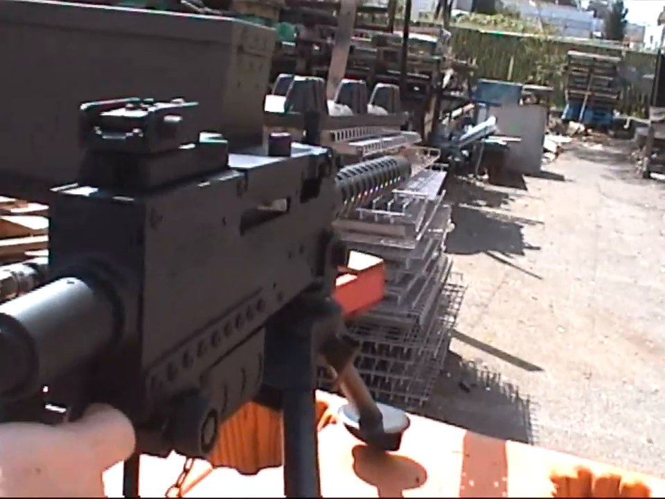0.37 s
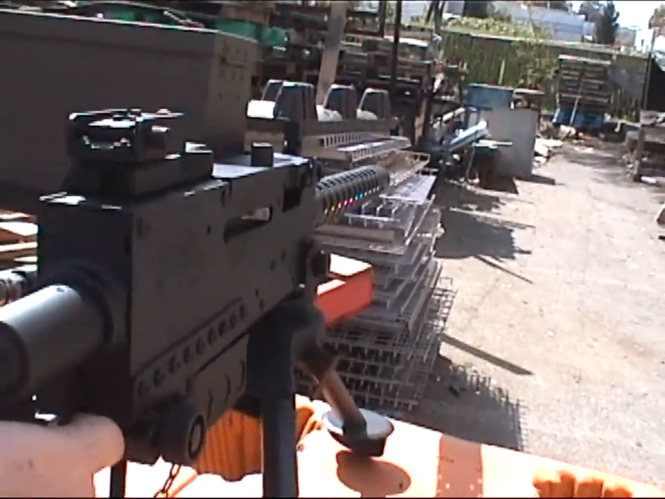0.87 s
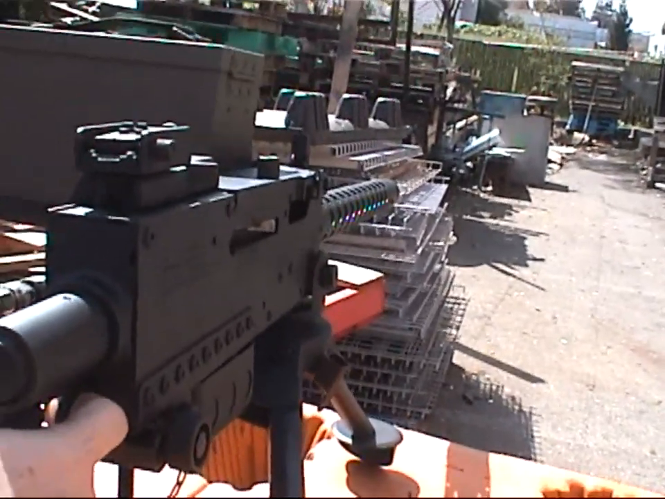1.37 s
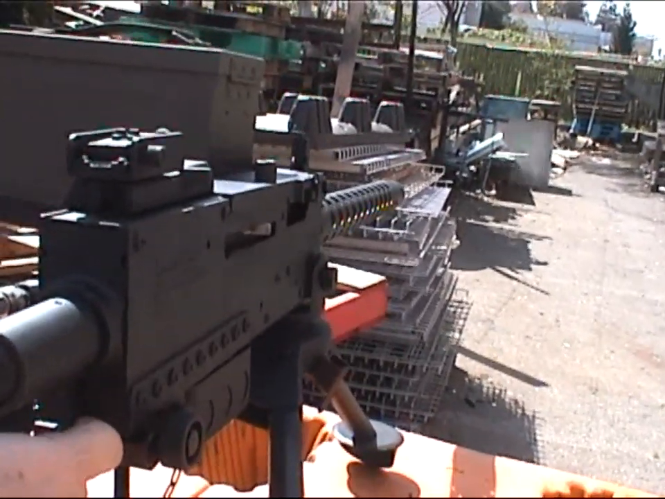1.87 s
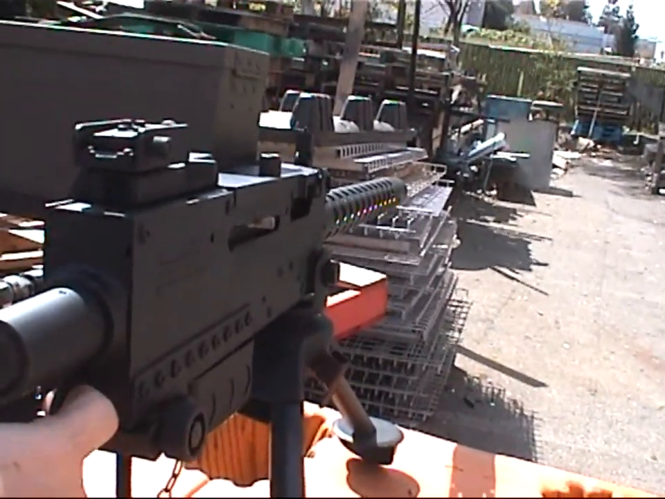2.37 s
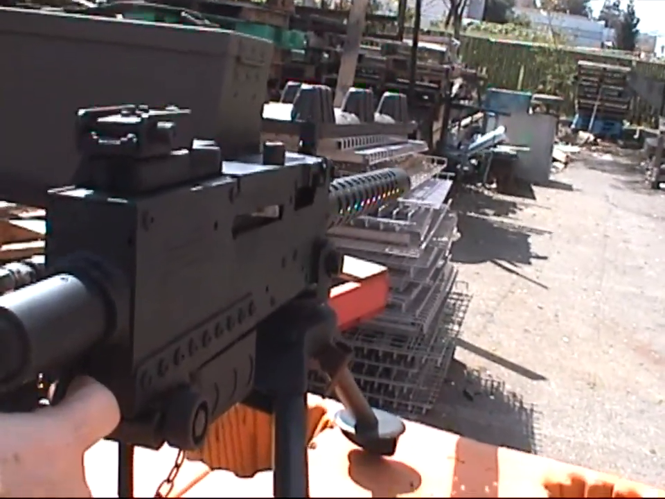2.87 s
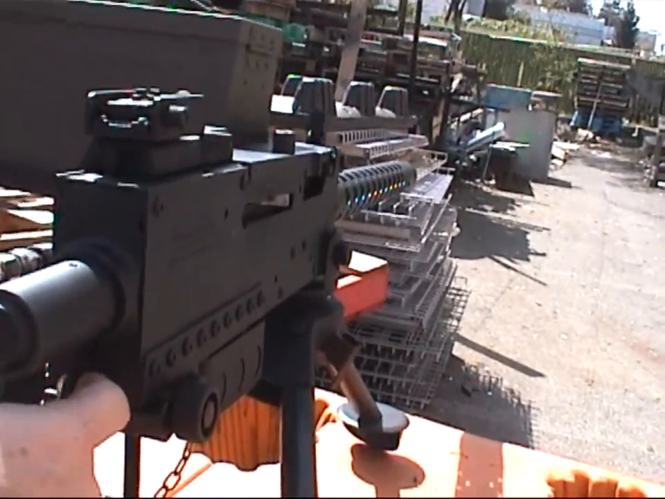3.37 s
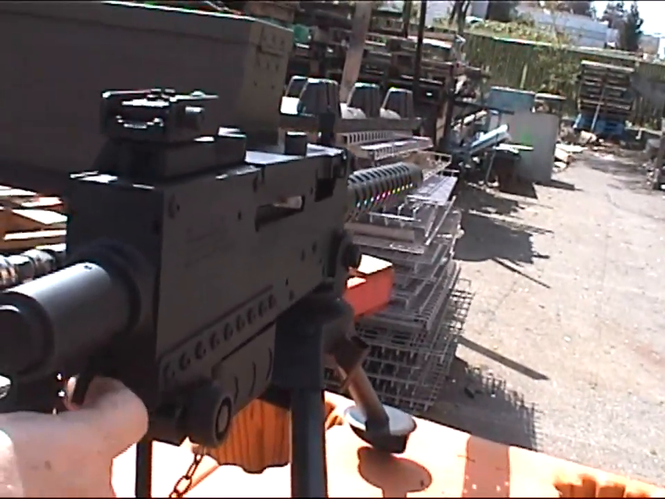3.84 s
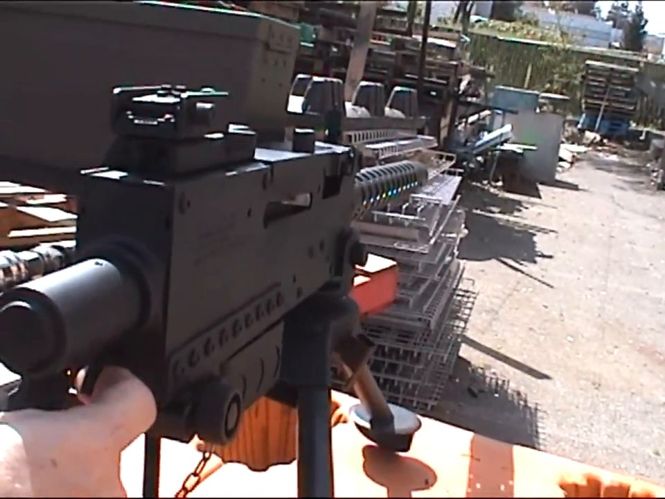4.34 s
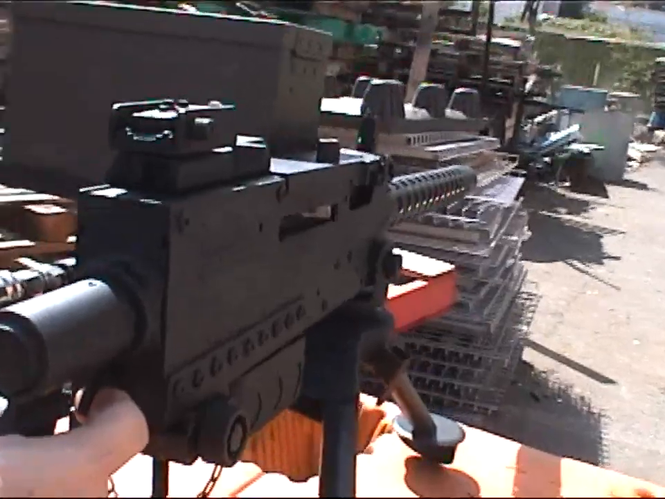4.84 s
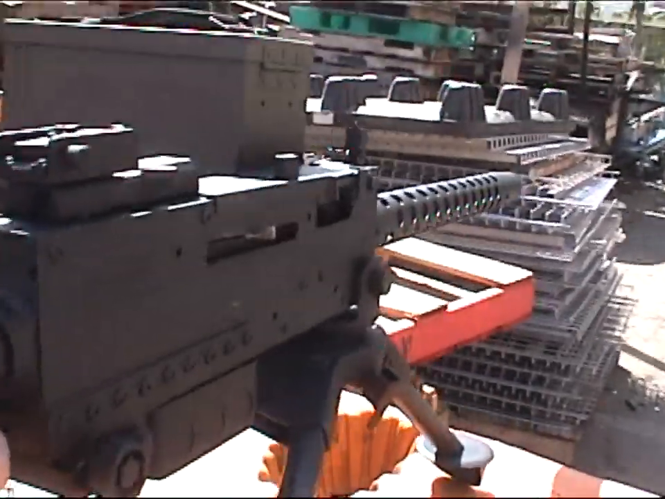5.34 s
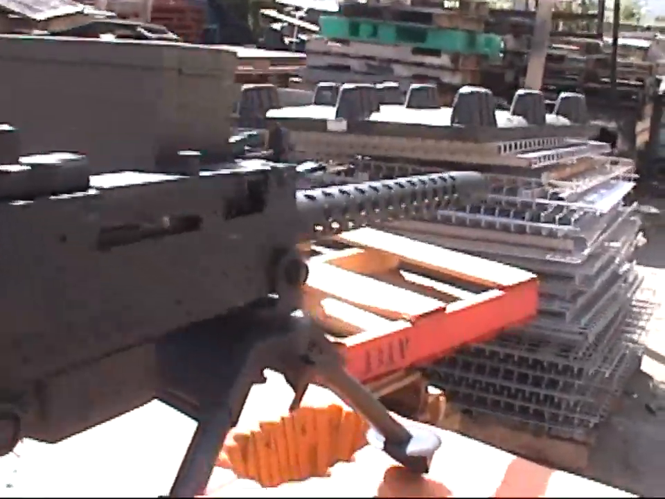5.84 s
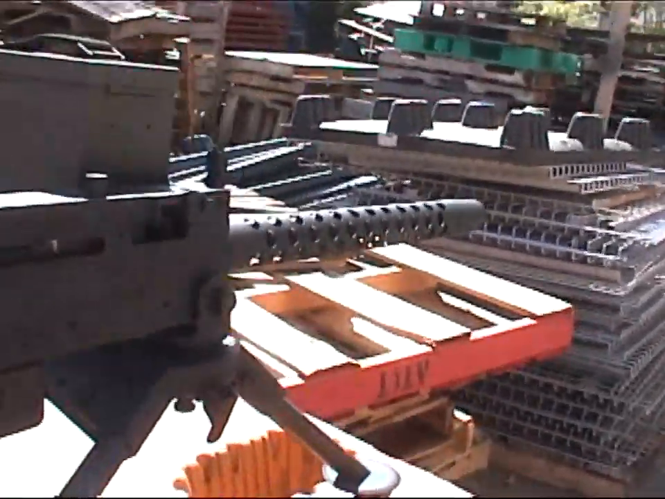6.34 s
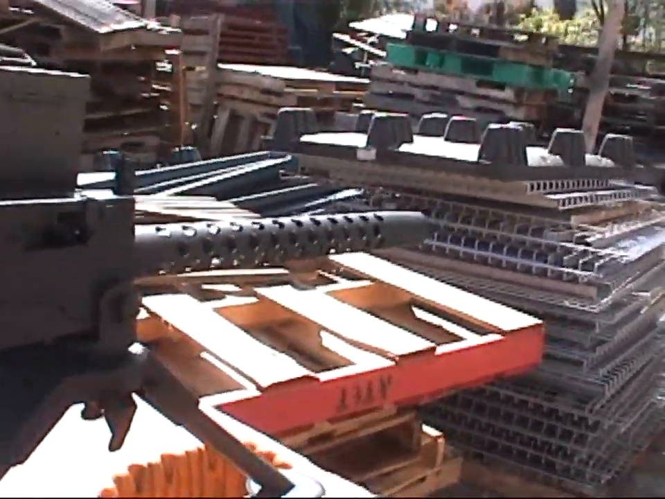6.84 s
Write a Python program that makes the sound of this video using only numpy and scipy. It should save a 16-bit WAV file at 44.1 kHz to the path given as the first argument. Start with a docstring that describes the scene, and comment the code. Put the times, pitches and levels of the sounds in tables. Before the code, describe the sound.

In an open pallet yard, a paintball machine gun is heard very close in stereo, firing about eight rounds a second. Each round has a light metallic bolt clack, a hard short pop ringing the barrel, a gas burst, a quick vent hiss and tiny feed clicks. The end of a burst gives two shots at 0.07-0.2 s, with ball strikes already booming on distant steel. Four shots follow at 1.3-1.7, a dry snap off to one side at 1.9, nine shots at 2.5-3.5, a small click near 3.7, thirteen at 4.0-5.6, and six from 6.5 to the end. Balls crack and ring a hollow container from 2.6 to 3.7, 4.2 to 5.7 and after 6.7, increasingly hollow and dull. A distant machine drone recedes early over faint town hum. From 5 to 6.4 the microphone moves beside the barrel, making the final shots brighter and hollower.

```python
"""Pallet yard: a gas-driven paintball gun fires five bursts close to a stereo microphone.
Each round is a bolt clack, a pressure-dip pop that rings the barrel, a gas blast and a vent hiss, in shaped noise.
The balls crack on a distant steel container, ring its panels and make it boom; the yard echoes the rounds.
Small clicks, one snap, a faint town hum and a machine that moves away fill the rest."""
import sys
import numpy as np
from scipy import signal
from scipy.fft import rfft, irfft
from scipy.io import wavfile
from scipy.ndimage import uniform_filter1d, map_coordinates

SR = 44100
rng = np.random.default_rng(int(sys.argv[2]) if len(sys.argv) > 2 else 0)


def file_out(sig):
    """Save sig as 16-bit WAV at sys.argv[1]."""
    # one column per channel
    cols = np.atleast_2d(sig).T
    # limit, then scale
    lim = np.clip(cols, -1, 1)
    pcm = np.round(lim * 32767).astype(np.int16)
    wavfile.write(sys.argv[1], SR, pcm)


def invert_db(level):
    """Linear amplitude ratio for a level in decibels (20 dB per decade), elementwise."""
    return 10 ** (np.asarray(level, dtype=float) / 20)


N = 317961
BLAST_DB = -12  # common reference of the pop and the gas blast

# Balls striking steel. Each row: time in seconds, relative level in dB, boom treble tilt in dB per three octaves.
HITS = [(0.003, -8.5, -4.5), (0.029, -11, 1.5), (0.159, -13.5, -11), (0.285, -20, 9), (2.649, -7.5, 4),
        (2.785, -16, -4.5), (2.954, -11, 1), (3.042, -10.5, 4), (3.177, -10, 1.5), (3.332, -14, 1),
        (3.417, -11.5, 4), (3.545, -12, 3), (3.659, -22, -1), (4.214, -10, 3), (4.364, -10, -1.5),
        (4.472, -10, 1), (4.651, -12.5, -1.5), (4.747, -12, 1), (4.868, -13, 1.5), (4.983, -11.5, 2.5),
        (5.149, -13, 2.5), (5.276, -14.5, 1.5), (5.359, -11, 3), (5.609, -11, 3), (5.738, -10, 1.5),
        (6.691, -10.5, -2.5), (6.825, -9.5, 0), (6.949, -10, -1), (7.08, -11, 0)]
# Reverberation by octave. Each row: centre in Hz, container boom in relative dB, boom t60 in seconds,
# yard echo in relative dB, echo t60 in seconds, gain of the side signal in dB.
BANDS = [(110, -52, .6, -43.5, .3, -20), (282, -24, 0.54, -9.5, 0.46, -22),
         (495, -15.5, 0.54, -10, 0.44, -16.5), (953, -14, 0.8, -2.5, 0.35, -16.5),
         (2030, -11, 0.68, -0.5, 0.34, -13.5), (4000, -11.5, 0.37, -6, 0.62, -6.5),
         (8000, -22, 0.17, -11, 0.38, -3.5), (13040, -44, .3, -34, .2, -3.5)]


def tone(x, table):
    """Minimum-phase filter through (Hz, relative dB) points, from the log-gain cepstrum; white noise keeps its rms."""
    hz, db = np.transpose(table)
    grid = np.maximum(np.fft.rfftfreq(4096, 1 / SR), 1)
    cepstrum = irfft(np.log(invert_db(np.interp(np.log(grid), np.log(hz), db))))
    cepstrum[1:2048] *= 2
    cepstrum[2049:] = 0
    kernel = irfft(np.exp(rfft(cepstrum)))[:2048]
    kernel = kernel / np.sqrt(np.sum(kernel ** 2))
    return signal.fftconvolve(x, kernel[None], axes=1)[:, :N]


def train(times_s, gains):
    """One impulse per event."""
    at = (np.asarray(times_s) * SR).astype(int)
    gains = gains + 0 * at
    return np.bincount(at[at < N], gains[at < N], N)


def swell(times_s, db, rise_s, t60_s):
    """Amplitude envelope: powers of the events rise, die away and add."""
    up = np.exp(-1 / (rise_s * SR))
    down = np.exp(-np.log(1e6) / (t60_s * SR))
    power = signal.lfilter([1 - up], np.convolve([1, -up], [1, -down]), train(times_s, invert_db(db) ** 2))
    return np.sqrt(power.clip(0))


def ring(x, hz, t60_s):
    """One decaying mode: a complex one-pole resonator."""
    pole = np.exp(2j * np.pi * hz / SR - np.log(1000) / (t60_s * SR))
    return signal.lfilter([1], [1, -pole], x).imag


def band(x, hz, width_hz):
    """Band-pass that keeps white noise at about rms 1."""
    low, high = max(hz - width_hz / 2, hz / 4), min(hz + width_hz / 2, 0.45 * SR)
    sos = signal.butter(2, [low, high], "band", fs=SR, output="sos")
    return signal.sosfilt(sos, x) * np.sqrt(SR / 2 / (high - low))


def above(x, hz):
    """Second-order high-pass."""
    return signal.sosfilt(signal.butter(2, hz, "high", fs=SR, output="sos"), x)


def hiss(grain=0):
    """Mid and side white noise; a fast random gain shared by both makes it crackle."""
    noise = rng.standard_normal((2, N))
    return noise * invert_db(grain * 2.5 * uniform_filter1d(rng.standard_normal(N), size=16))


def walked():
    """Share of the way that the microphone has been carried from behind the gun to beside the barrel."""
    # Each row: time in seconds, share of the way.
    walk = [(0, 0), (5.0, 0), (6.4, 1), (7.21, 1)]
    return np.interp(np.arange(N) / SR, *np.transpose(walk))


def rounds():
    """Pop time and relative clack, vent, echo and thump dB per ball; the clack gets softer along each burst."""
    # Trigger pulls. Each row: first pop in seconds, then first clack, vent, echo and thump in relative dB.
    bursts = [(0.0674, -15.5, -14, -13, 1.5), (1.3378, -14.5, -12.5, -18, 5),
              (2.4763, -15, -13.5, -19.5, 0), (4.0400, -15, -13.5, -21.5, -1),
              (6.5225, -16.5, -13.5, -21, 0.5)]
    # Balls in each burst.
    counts = [2, 4, 9, 13, 6]
    # Balls already fired when each burst is first heard: the first burst is under way.
    fired_before = [8, 0, 0, 0, 0]
    cycle_s, fade_db, fade_rounds = 0.12674, -5.5, 4.0  # fade_rounds: time constant in balls
    first_s, clack_db, vent_db, echo_db, thump_db = np.repeat(bursts, counts, axis=0).T
    before = np.repeat(fired_before, counts)
    k = np.concatenate([np.arange(count) for count in counts])
    fade = np.exp(-before / fade_rounds) - np.exp(-(before + k) / fade_rounds)
    return first_s + k * cycle_s, clack_db + fade_db * fade, vent_db, echo_db, thump_db


def clack(s, clack_db):
    """Two light valve ticks, then the heavier bolt: metal impacts as crackling noise ahead of the pop."""
    # Each row: frequency in Hz, density in relative dB per Hz.
    clack_colour = [(59, -63.5), (100, -24.5), (381, -12.5), (950, 2), (3940, 6.5), (4380, 2), (5190, -0.5),
                    (7290, 1.5), (12400, -5.5), (16000, -15.5)]
    late, louder = rng.standard_normal((2, len(s)))
    valve = swell(s - 0.0185, clack_db - 18.5, 0.001, 0.05) + swell(s - 0.0150, clack_db - 15, 0.001, 0.019)
    bolt = swell(s - 0.0132 + 0.00071 * late, clack_db + 6 + 0.81 * louder, 0.00076, 0.071)
    return tone(hiss(1.5) * (valve + bolt), clack_colour)


def blast(s):
    """Turbulent gas leaves the muzzle: a crackling noise burst."""
    # Each row: frequency in Hz, density in relative dB per Hz.
    blast_colour = [(59, -24.5), (100, -6.5), (1150, -2), (2130, 1.5), (3050, -3), (4110, -2), (6020, -6.5),
                    (9410, -7), (15000, -18), (16000, -46.5)]
    level_db = BLAST_DB + 10 + 0.99 * rng.standard_normal(len(s))
    return tone(hiss(1.4) * swell(s + 0.00011, level_db, 0.0034, 0.05), blast_colour)


def vent(s, vent_db):
    """Spent gas vents 16 ms after the pop: crackling noise."""
    # Each row: frequency in Hz, density in relative dB per Hz.
    vent_colour = [(59, -19), (100, -20.5), (801, 3), (1420, -1.5), (2040, -6), (4110, 1.5), (6150, -0.5),
                   (13800, -10), (16000, -30.5)]
    late, louder = rng.standard_normal((2, len(s)))
    puff = swell(s + 0.016 + 0.00074 * late, vent_db + 6.5 + 0.87 * louder, 0.0017, 0.037)
    return tone(hiss(1.5) * puff, vent_colour)


def feed(s):
    """Small parts click after each pop as the next ball feeds."""
    # Each row: delay in seconds, mean level in dB.
    feed_clicks = [(.041, -21), (.064, -31), (.081, -31.5)]
    puffs = sum(swell(s + lag, db + 3 * rng.standard_normal(len(s)), 0.0003, 0.0086) for lag, db in feed_clicks)
    return band(hiss() * puffs, 8000, 9000)


def pop(s, thump_db):
    """A 0.6 ms pressure dip, alike every round, slaps off pallets and rings the barrel; its wave thumps the mic."""
    # Barrel and housing modes. Each row: frequency in Hz, relative level in dB, t60 in seconds.
    barrel = [(190, -42, 0.16), (350, -34, .08), (709, -12.5, 0.097), (916.5, -11, 0.084), (1646, -18, 0.1),
              (2113, -6.5, 0.086)]
    # Reflections from pallet stacks. Each row: delay in seconds, relative level in dB.
    slaps = [(.0095, -16), (0.031, -18), (0.033, -23), (0.033, -20.5), (0.039, -15), (0.0418, -17)]
    kick = -train(s, invert_db(BLAST_DB + 7))
    dip = np.convolve(kick, np.hanning(28))[:N]
    out = invert_db(-4.5) * dip
    out += sum(invert_db(db) * np.roll(dip, int(lag * SR)) for lag, db in slaps)
    out += sum(invert_db(db) * ring(kick, hz, t60) for hz, db, t60 in barrel)
    out += invert_db(-10.5) * ring(kick * walked(), 610, 0.11)  # barrel sleeve's hollow note, heard from the side
    return out - ring(train(s, invert_db(thump_db - 24.5)), 77.0, 0.06)


def gun():
    """Sums the parts of every round; the pop is mid only."""
    s, clack_db, vent_db, _, thump_db = rounds()
    out = clack(s, clack_db) + blast(s) + vent(s, vent_db) + feed(s)
    out[0] += pop(s, thump_db)
    return out


def steel():
    """The crack of each ball and the panel modes that it rings, struck at a new spot each time."""
    # Panel modes. Each row: frequency in Hz, relative level in dB, t60 in seconds.
    panel_modes = [(310.6, 2, .8), (435, -3, 0.82), (450.5, 1, 1), (606, -0.5, 0.6), (670.6, 15, 0.14),
                   (703, 4, 0.84), (688, -2.5, 1.2), (1287, -2, 0.55), (925, -7.5, 1.1), (996, 2.5, 0.89),
                   (1425, 0, 0.87), (1560, 7.5, 0.5), (1950, 1.5, .6), (2150, 5, .5), (1727, 3, .55)]
    # The aim drifts to a hollower, duller panel. Each row: time in seconds, ring and crack in dB relative to the hit.
    aim = [(0, -31, -9), (2.6, -27, -10), (3.6, -28, -6), (4.6, -27, -5), (5.4, -21.5, -12),
           (7.1, -22.5, -14)]
    s, db, _ = np.transpose(HITS)
    aim_s, ring_db, crack_db = np.transpose(aim)
    out = band(hiss(2.3) * swell(s, db + np.interp(s, aim_s, crack_db), 0.0003, 0.025), 5500, 9000)
    out += band(hiss(2.5) * swell(s, db - 12.0, 0.0005, 0.095), 2000, 3400)
    blow_db = db + np.interp(s, aim_s, ring_db)
    rings = 0
    for hz, mode_db, t60 in panel_modes:
        spot_db = 2 * rng.standard_normal(len(s))
        rings = rings + ring(train(s, invert_db(blow_db + mode_db + spot_db)), hz, t60)
    out[0] += above(rings, 220.0)
    return out


def echoes():
    """Noise tails band by band: the yard's answer to each round and the container's boom at each hit."""
    s, _, _, echo_db, _ = rounds()
    hit_s, hit_db, treble_db = np.transpose(HITS)
    out = 0
    for hz, boom_db, boom_t60, yard_db, yard_t60, _ in BANDS:
        tilt_db = treble_db * np.log2(hz / 1000) / 3
        boom = swell(hit_s, hit_db + boom_db + tilt_db, 0.00082, boom_t60)
        # the hollow inside keeps a faint share much longer
        late = swell(hit_s, hit_db + boom_db - 20, 0.018, 2.3 * boom_t60)
        yard = swell(s + 0.0068, echo_db + yard_db, 0.0024, yard_t60)
        out = out + band(hiss(0.81), hz, 0.78 * hz) * np.sqrt(boom ** 2 + late ** 2 + yard ** 2)
    return above(out, 140.0)


def clicks():
    """Small noise puffs: early ones are far echoes of the rounds, others a loose part or ball; one thin ping."""
    # Each row: time in seconds, level in dB, centre in Hz, t60 in seconds.
    small_clicks = [(0.427, -39.5, 10640, .04), (.460, -36, 4670, .08), (.583, -39, 4280, 0.1),
                    (.695, -47.5, 4140, 0.1), (1.251, -56.5, 8000, .035), (1.886, -32.5, 2180, 0.33),
                    (2.11, -51, 3900, .06), (2.172, -62, 10500, .02), (2.313, -58, 9000, .02),
                    (2.378, -46.5, 4600, .05), (3.669, -29, 9010, 0.089), (3.712, -46, 8500, .03),
                    (6.235, -56, 6100, .1)]
    noise = hiss()
    out = sum(band(noise * swell([s], db, 0.00026, t60), hz, 0.5 * hz) for s, db, hz, t60 in small_clicks)
    out[0] += ring(train([3.712], invert_db(-50)), 9430, 0.5)
    return out


def snap():
    """A ball bursts on a near edge: very short modes without bass, off to one side."""
    # Each row: frequency in Hz, level in dB, t60 in seconds.
    snap_modes = [(2400, -4, .005), (3500, -8, .004), (6000, -5, .002), (12000, -9, .002)]
    modes = sum(ring(train([1.8808], invert_db(db)), hz, t60) for hz, db, t60 in snap_modes)
    return above(modes, 1300.0) * np.array([[1], [0.4]])


def machine():
    """Wavering noise drone of a distant machine that moves away: level falls as one over distance."""
    # Each row: frequency in Hz, density in relative dB per Hz.
    drone_colour = [(30, -6), (130, -12), (240, -3), (450, -10.5), (650, -8), (1200, -13), (1900, -10.5),
                    (2250, -20), (2750, -16), (3500, -23.5), (6000, -34), (12000, -54)]
    start_db, waver_db = -34.5, 1.1
    leaves_s = 0.41  # time to add the starting distance again
    waver = np.repeat(rng.standard_normal(N // 2000 + 1), 2000)
    waver = uniform_filter1d(waver, size=2000)[:N]
    distance = 1 + np.arange(N) / SR / leaves_s
    return tone(hiss(), drone_colour) * invert_db(start_db + waver_db * waver) / distance


def town():
    """Distant hum: steady coloured noise."""
    # Each row: frequency in Hz, density in relative dB per Hz.
    town_colour = [(18, -49), (30, -22), (287, 0.5), (526, -4), (649, 0), (844, -6.5), (6210, -30),
                   (13000, -39.5), (16000, -57)]
    return tone(hiss(), town_colour) * invert_db(-49)


def scene():
    """Mid and side to left and right; the gun reaches the left port sooner and brightens along the walk."""
    side_treble_db, balance_db = 3, -0.8  # balance: left minus right
    lead_behind_s, lead_beside_s = 4e-6, 3.4e-5
    near = gun()
    far = steel() + echoes() + clicks() + snap() + machine() + town()
    way = walked()
    treble = signal.sosfiltfilt(signal.butter(1, 7000.0, "high", fs=SR, output="sos"), near)
    near += (invert_db(side_treble_db * way) - 1) * treble
    hz = np.fft.rfftfreq(N, 1 / SR)
    bands = np.array(BANDS)
    side_db = np.interp(np.log(hz + 1), np.log(bands[:, 0]), bands[:, -1])
    side = irfft(rfft(near[1] + far[1]) * invert_db(side_db), N)
    half_lead = (lead_behind_s + (lead_beside_s - lead_behind_s) * way) * SR / 2  # samples
    left, right = (map_coordinates(near[0], [np.arange(N) + shift], order=5, mode="mirror")
                   for shift in (half_lead, -half_lead))
    stereo = np.array([left + far[0] + side, right + far[0] - side])
    return stereo * invert_db(np.array([[0.5], [-0.5]]) * balance_db)


def top_cut(x):
    """Nothing passes above the cut-off."""
    return signal.sosfilt(signal.butter(12, 16430, fs=SR, output="sos"), x)


def record(dry):
    """The microphone drops the deep bass; the input stage rounds the loudest peaks and cuts the top."""
    rounded = 1.063 * np.tanh(above(dry, 52.0) / 1.111)
    mix = signal.sosfilt(signal.ellip(8, 0.2, 70, 16100, fs=SR, output="sos"), rounded)
    return top_cut(mix)


dry = scene()
out = record(dry)
file_out(out)
```